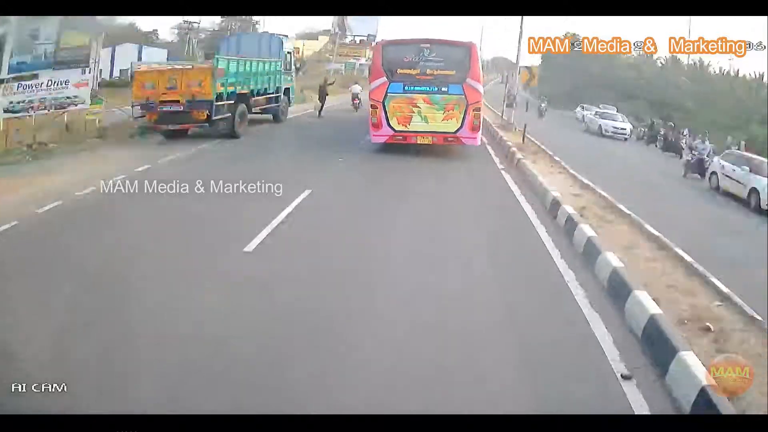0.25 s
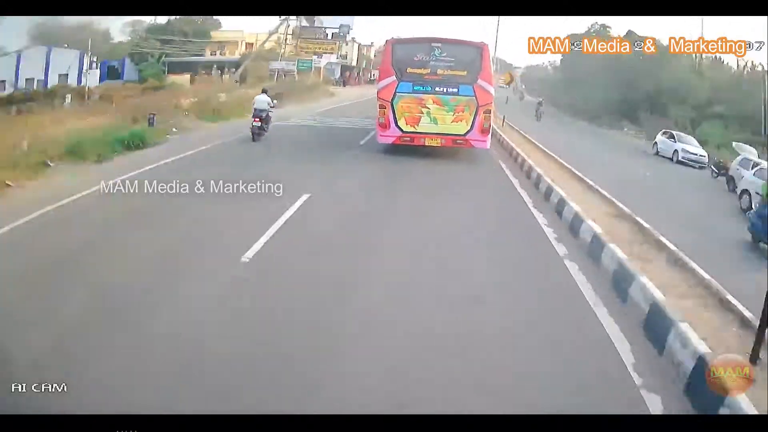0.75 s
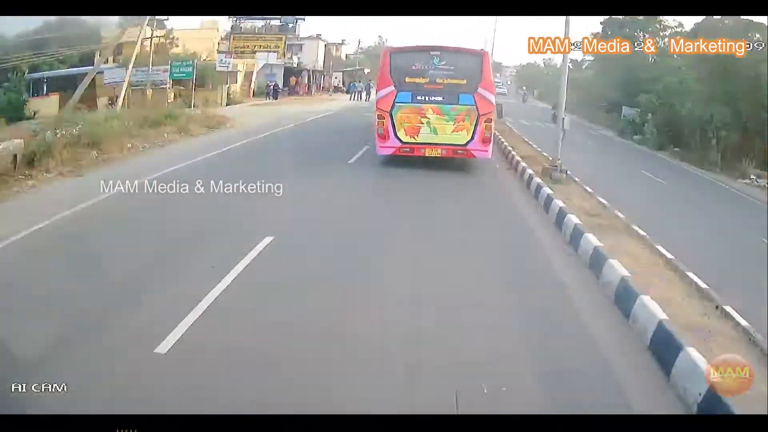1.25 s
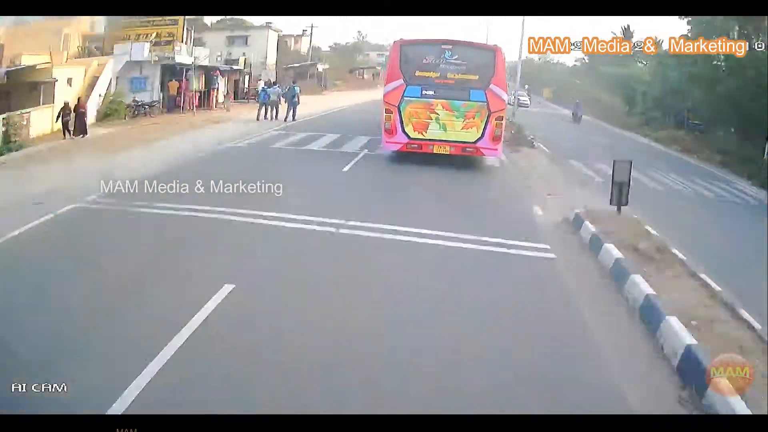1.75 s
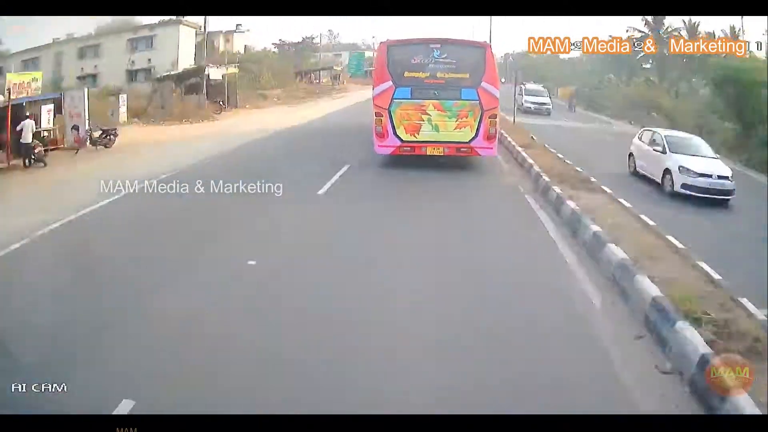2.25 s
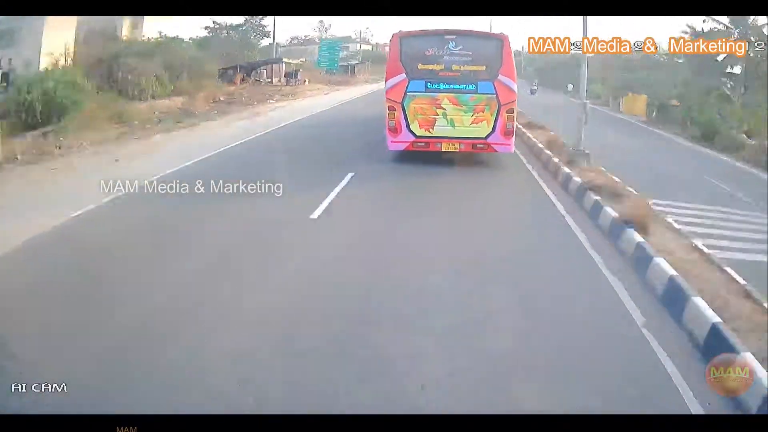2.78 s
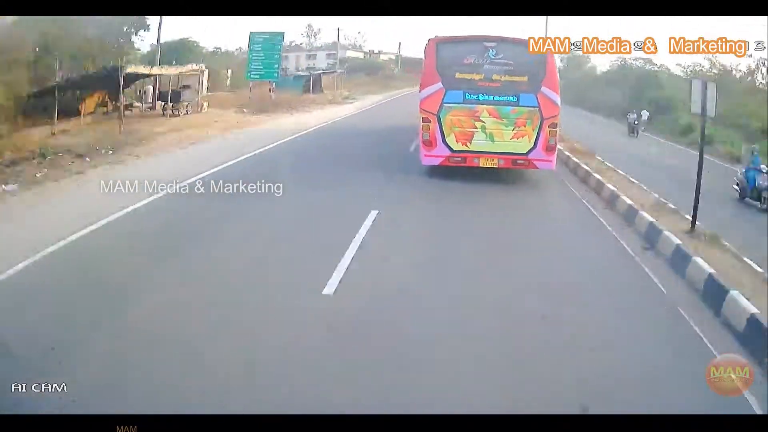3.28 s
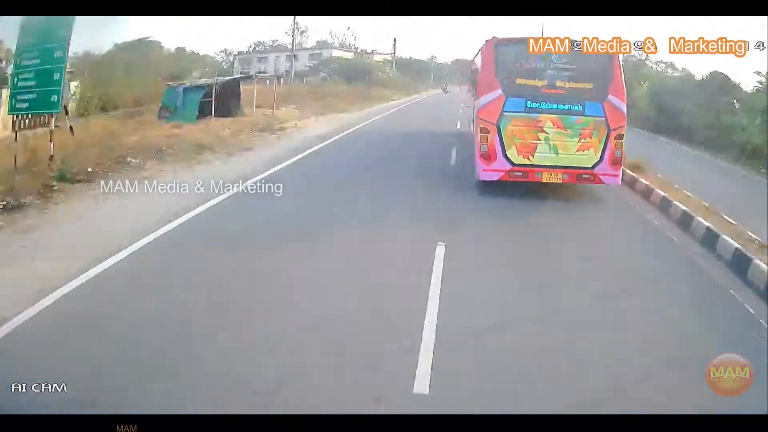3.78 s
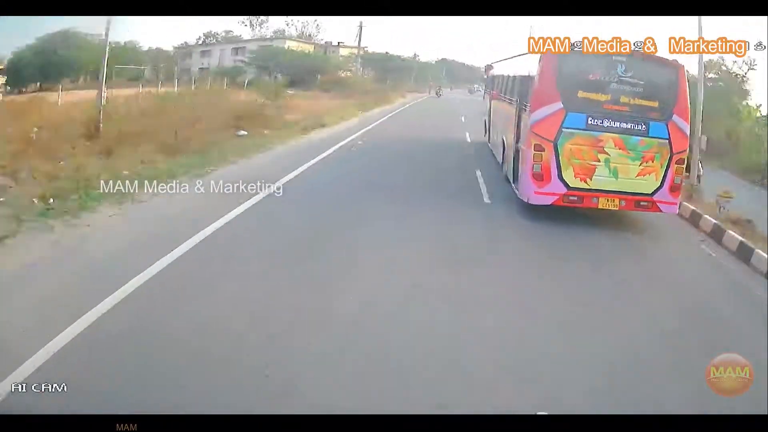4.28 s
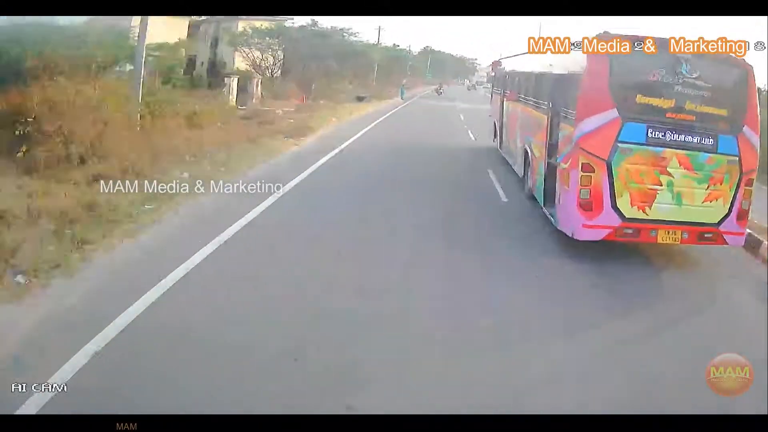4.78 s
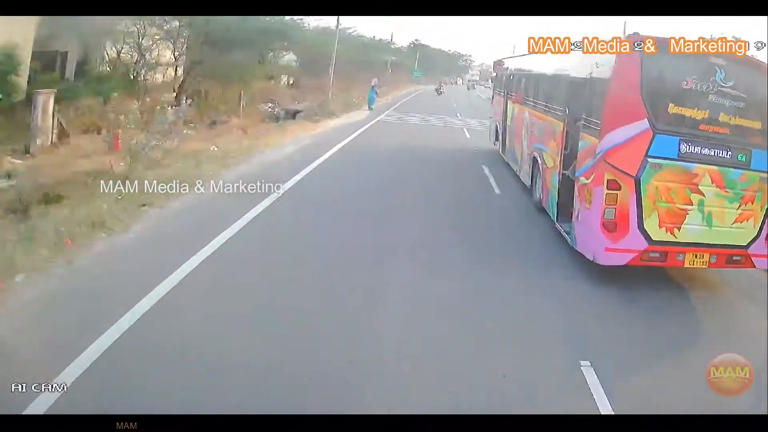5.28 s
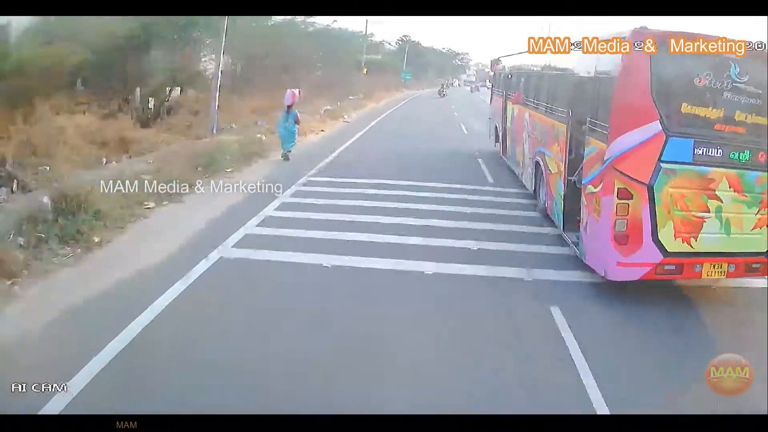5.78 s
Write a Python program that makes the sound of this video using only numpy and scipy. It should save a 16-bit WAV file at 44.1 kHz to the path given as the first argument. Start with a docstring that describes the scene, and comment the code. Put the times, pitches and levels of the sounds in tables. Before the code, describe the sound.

From inside the cab of a moving bus, a diesel engine drones with tyre roar and fine clatter. A passed lorry hisses briefly, followed by a small squeak and a dull knock. A shrill air horn taps twice, a lower horn sounds once, then the first stutters through a long call of rapid blasts. The horns echo off traffic and roadside while the cab noise sinks.

```python
"""Air horns from a diesel cab

A six-cylinder diesel drones at orders of its firing rate, with road roar, injector clatter and a
turbo whistle. A passed lorry hisses; a squeak and dull knocks follow. Air-driven reeds sound the horns:
a three-trumpet horn taps twice, a lower two-trumpet horn once, then the first stutters through a long
call while the cab noise sinks. Traffic and roadside return smeared, Doppler-shifted echoes."""
import sys
import numpy as np
from scipy import signal
from scipy.fft import rfft, irfft
from scipy.io import wavfile
from scipy.ndimage import uniform_filter1d

SR = 44100
rng = np.random.default_rng(int(sys.argv[2]) if len(sys.argv) > 2 else 0)


def dump_mix(stems):
    """Bounce the given channels to the path in sys.argv[1] as a 16-bit WAV at rate SR."""
    frames = np.atleast_2d(stems).T  # one column per channel
    limited = np.clip(frames, -1, 1)  # hard clip at full scale
    pcm = np.round(limited * 32767).astype(np.int16)
    wavfile.write(sys.argv[1], SR, pcm)


N = 265923
T = np.arange(N) / SR
F = np.maximum(np.fft.rfftfreq(N, 1 / SR), 1)
LR = np.array([[.5], [-.5]])  # splits a difference between left and right

# Engine slowing a little, wavering under the long call: time_s, firing_hz, drone_db
ENGINE_COURSE = [(.1, 65.4, -23.5), (1.54, 65, -22.5), (1.69, 65.3, -28.5), (2.1, 65.3, -23),
                 (2.37, 65., -24.5), (2.5, 63.5, -23), (4.2, 63.8, -23.5), (4.42, 62.26, -26.5),
                 (4.56, 62.7, -22.5), (4.8, 62.66, -28), (5.14, 63.1, -31), (5.21, 62.2, -23),
                 (5.29, 61.3, -40.5), (5.36, 61.3, -26), (5.47, 62.55, -29), (5.55, 62.6, -31.5),
                 (5.85, 62.4, -29)]
# Lines of the six-cylinder cycle, relative to the drone: firing_multiple, pulling_db, eased_db
ENGINE_ORDERS = [(.667, -16, -15), (.833, -23, -15), (1, -1.5, -1), (1.833, -13.5, -16),
                 (2.001, -17, -20.5), (2.165, -11.5, -20), (2.5, -13.5, -14.5), (3, -14.5, -15),
                 (4.333, -41, -23)]
# Cab noise, sinking under the long call: time_s, roar_db, hiss_db
CAB_LEVELS = [(.1, -28, -33), (.7, -28, -32.5), (1.5, -28.3, -33.5), (2.6, -27.3, -34), (3.4, -27.3, -34.5),
              (4.55, -28.3, -34.5), (4.9, -30.5, -37.5), (5.85, -33.5, -39)]
# Spectral shape of tyre and body roar: frequency_hz, density_db
ROAR_SPECTRUM = [(14, -25), (25, -12), (45, -15), (65, -11.5), (81, -5), (92, -14.5), (114, -11), (151, -9),
                 (300, -8.5), (446, -15), (766, -16), (882, -19), (1140, -25), (2400, -45), (3120, -70)]
# Spectral shape of clatter and wind hiss: frequency_hz, density_db
HISS_SPECTRUM = [(710, -17.5), (1200, -2), (1800, -9), (1980, -9), (2540, -12), (3500, -16), (3770, -14),
                 (5480, -16), (7550, -22.5), (8770, -20), (11100, -32), (14300, -42.5), (15500, -54.5)]
# Panel resonances, relative to the hiss: centre_hz, width_hz, level_db
PANEL_MODES = [(785, 50, -12), (2190, 40, -20), (2595, 40, -16), (2680, 50, -16), (3720, 70, -21),
               (4640, 300, -16), (5390, 150, -21)]
# Likeness of left and right cab noise: frequency_hz, coherence
CAB_COHERENCE = [(60, 1.0), (130, 0.88), (290, 0.69), (640, 0.65), (1410, 0.6), (3100, 0.73), (6820, 0.82),
                 (15000, 0.99)]
# Balance of the cab noise: frequency_hz, left_minus_right_db
CAB_BALANCE = [(60, 3.5), (110, 3.5), (200, 2.5), (380, 1.0), (700, 1.0), (1290, 0.5), (2380, 0.0),
               (4400, 0.0), (8120, -1.0), (15000, 0.0)]
# Turbo whistle: time_s, pitch_hz, level_db
TURBO_COURSE = [(.1, 8630, -62.5), (.7, 9170, -57), (1.6, 8900, -55.5), (1.7, 8750, -69.5),
                (1.8, 8200, -54), (2.7, 8560, -74), (4.5, 8370, -60.5), (5.9, 8570, -73)]
# Hiss of a lorry passed on the verge: time_s, level_db
LORRY_LEVELS = [(.52, -70), (.6, -40), (.72, -40), (.85, -52.5), (1.1, -49.5)]
# One rising squeak: start_s, end_s, from_hz, to_hz, level_db
SQUEAK_GLIDE = (1.01, 1.042, 1330, 1620, -28.5)
# Knocks in the cab: start_s, level_db, centre_hz, width_hz, t60_s
CAB_KNOCKS = [(1.622, -21.5, 800, 900, .12), (1.64, -24.5, 260, 25, .3), (4.2, -33, 2000, 2000, .03)]
# Horn spectra, a row per harmonic from the first, a column per trumpet: level_db
HIGH_HARMONICS = [(-37.5, -34.5, -39.5), (-20, -25, -18), (-29, -27, -26), (-27.5, -30, -32.5),
                  (-30, -30.5, -31.5), (-26.5, -29, -31), (-28.5, -31, -30.5), (-31.5, -31, -32),
                  (-33, -34, -37), (-33, -36, -35), (-29.5, -35.5, -34), (-30, -36, -39),
                  (-37.5, -38.5, -41.5), (-42.5, -43, -42.5), (-49, -43.5, -61), (-65, -60.5, -48),
                  (-60, -51.5, -86), (-46, -66, -78.5)]
LOW_HARMONICS = [(-39.5, -42.5), (-27, -25.5), (-27, -36), (-28.5, -40.5), (-39.5, -37.5), (-44.5, -37),
                 (-41, -43.5), (-40, -50), (-39.5, -40), (-39.5, -46), (-56, -44), (-41.5, -51),
                 (-42.0, -37.5), (-41, -45), (-46, -49), (-47, -50.5), (-44, -54), (-42.5, -61),
                 (-54.5, -59), (-50, -57), (-53, -78.5), (-59, -78), (-58, -80)]
# Valve presses; weak air lowers the deep overtones: start_s, end_s, rise_s, level_db, deep_db, shrill_db
HIGH_PRESSES = [(2.783, 2.85, 0.017, -3.5, -13, 0.9), (2.89, 2.96, 0.019, -3.5, -10.5, 1.5),
                (4.576, 4.66, .004, -0.5, -6.5, -0.5), (4.718, 5.021, .003, -2, -1, 1.1),
                (5.071, 5.162, .003, -3.5, -2.5, 3), (5.225, 5.301, .002, -2, -1.3, 0.5),
                (5.369, 5.411, .002, -2, -1.3, .4), (5.467, 5.537, .0018, -2, 0.3, 3.5),
                (5.621, 5.655, .0016, -1.4, -3.5, 4), (5.756, 5.811, .0024, -1.4, -6.5, 3)]
LOW_PRESSES = [(3.741, 3.879, 0.033, .1, -9.5, 1)]
# Side the horns favour as traffic shifts: time_s, left_minus_right_db
HORN_BALANCE = [(2.7, -1.5), (3.4, -1.5), (3.7, 4), (4.2, 4), (4.5, -6)]

HIGH_PITCHES_HZ, LOW_PITCHES_HZ = [749.6, 803., 892.3], [570., 687.]
EASE_S = 1.52  # the driver eases the throttle
DEEP_BELOW_HZ, SHRILL_ABOVE_HZ = 2000, 4200  # bands of horn overtones
VALVE_S, SURGE, SURGE_S = .0017, .22, .022
PRESS_SPREAD_DB, KNOCK_SPREAD_DB = .47, 3.4  # scatter between presses and between injections
RASP_PER_DB, RASP_DB_PER_S = -.28, -23  # reeds rasp more on weak air, less in a long press
ECHO_LAG_S, ECHO_PAIRS, DOPPLER_RANGE = .028, 6, (-.012, .045)
START_S, END_S, TOP_HZ = .0762, 5.887, 15560


def undb(db):
    """Amplitude ratio of a level in decibels."""
    return 10 ** (np.asarray(db) / 20)


def unit(x):
    """Normalisation to an rms of 1."""
    return x / np.sqrt(np.mean(x ** 2))


def over_time(table):
    """Linear interpolation in time: one curve for each column after the first."""
    times, *columns = np.transpose(table)
    return [np.interp(T, times, column) for column in columns]


def over_hz(table):
    """Interpolation on a logarithmic frequency axis."""
    hz, value = np.transpose(table)
    return np.interp(np.log(F), np.log(np.maximum(hz, 1)), value)


def wander(rate_hz):
    """Band-limited fluctuation: random steps, smoothed twice, of rms 1."""
    hold = int(SR / rate_hz)
    steps = np.repeat(rng.standard_normal(N // hold + 1), hold)
    return unit(uniform_filter1d(uniform_filter1d(steps, hold), hold)[:N])


def lag(x, seconds):
    """First-order relaxation with the given time constant."""
    pole = np.exp(-1 / (max(seconds, 1e-4) * SR))
    return signal.lfilter([1 - pole], [1, -pole], x)


def cab_spectra(gain):
    """Partial coherence: left and right noise spectra mix a common and an opposed part."""
    mid, side = rfft(rng.standard_normal((2, N)))
    coherence = np.clip(over_hz(CAB_COHERENCE), 0, 1)
    pair = np.sqrt(1 + coherence) * mid + 2 * LR * np.sqrt(1 - coherence) * side
    return gain * undb(LR * over_hz(CAB_BALANCE)) * pair


def resonance(hz, width_hz):
    """A resonance selects a narrow band from broadband noise."""
    return unit(irfft(cab_spectra(1 / (1 + ((F - hz) / width_hz * 2) ** 2)), N))


def fluttering_noise(spectrum, swell_db, flicker_db, rate_hz):
    """Amplitude modulation: half-octave bands swell together and flicker independently."""
    whole, swell, out = cab_spectra(undb(over_hz(spectrum))), wander(1.505), 0
    for octave in np.arange(4, 14.1, .5):
        band = np.clip(1 - 2 * abs(np.log2(F) - octave), 0, 1)
        out += undb(swell_db * swell + flicker_db * wander(rate_hz)) * irfft(whole * band, N)
    return unit(out)


def firing_drone(firings, eased):
    """Periodic combustion gives a line spectrum whose balance depends on load."""
    drone = 0
    for order, pulling_db, eased_db in ENGINE_ORDERS:
        waver_db = (.8 if order == 1 else 2.2) * wander(11)
        gain = undb(pulling_db + (eased_db - pulling_db) * eased + waver_db)
        drone += gain * np.sqrt(2) * np.sin(2 * np.pi * (order * firings + rng.random()))
    return drone


def road_roar():
    """Random vibration of tyres and body gives broadband noise, strongest in the bass."""
    return fluttering_noise(ROAR_SPECTRUM, swell_db=-.04, flicker_db=.64, rate_hz=8)


def injector_clatter(firings, eased):
    """Injection impacts modulate hiss and panel resonances; every second cylinder knocks harder."""
    index = firings.astype(int)
    knock_db = KNOCK_SPREAD_DB * rng.standard_normal(index[-1] + 1)[index] - 2.1 * (index % 2)
    knocks = undb(knock_db) * np.exp(-(firings % 1))
    panels = sum(undb(db - 3 * eased + 1.2 * wander(20)) * resonance(hz, width_hz)
                 for hz, width_hz, db in PANEL_MODES)
    hiss = fluttering_noise(HISS_SPECTRUM, swell_db=-.13, flicker_db=-.27, rate_hz=23)
    return (hiss + panels) * unit(1 + .52 * lag(knocks, .001))


def engine_and_road():
    """Drone and clatter are phase-locked to one firing cycle; the roar is independent of it."""
    firing_hz, drone_db = over_time(ENGINE_COURSE)
    roar_db, hiss_db = over_time(CAB_LEVELS)
    firings = np.cumsum(firing_hz * (1 + .0062 * wander(12))) / SR
    eased = lag(1. * (T > EASE_S), .05)
    drone = undb(drone_db + 3.5 * LR) * firing_drone(firings, eased)
    return drone + undb(roar_db) * road_roar() + undb(hiss_db) * injector_clatter(firings, eased)


def turbo_whistle():
    """Random modulation broadens the shaft tone into a narrow band of noise."""
    hz, db = over_time(TURBO_COURSE)
    phase = 2 * np.pi * np.cumsum(hz) / SR
    return undb(db) * (wander(450) * np.cos(phase) + wander(450) * np.sin(phase))


def lorry_hiss():
    """Two bands of treble noise swell and fade as a lorry is passed."""
    db = np.interp(T, *np.transpose(LORRY_LEVELS), left=-99, right=-99)
    return undb(db) * unit(resonance(7060, 900) + 1.3 * resonance(8600, 1600))


def squeak():
    """A linear chirp: one tone glides upward under an arched envelope."""
    start_s, end_s, from_hz, to_hz, db = SQUEAK_GLIDE
    progress = np.clip((T - start_s) / (end_s - start_s), 0, 1)
    phase = 2 * np.pi * np.cumsum(from_hz + (to_hz - from_hz) * progress) / SR
    return undb(db) * np.sin(np.pi * progress ** 1.8) * np.sin(phase)


def cab_knocks():
    """Damped resonances decay exponentially after a softened onset."""
    out = 0
    for start_s, db, hz, width_hz, t60_s in CAB_KNOCKS:
        decay = (T > start_s) * np.exp(-np.maximum(T - start_s, 0) * np.log(1000) / t60_s)
        out += undb(db) * lag(decay, .007) * resonance(hz, width_hz)
    return out


def air_valve(presses, rasp_db):
    """Line pressure peaks as the valve opens; the air supply sets a reed's band gains and roughness."""
    flow, deep_gain, shrill_gain, rasp = np.zeros((4, N))
    for start_s, end_s, rise_s, db, deep_db, shrill_db in presses:
        surge = 1 + SURGE * np.exp(-np.maximum(T - start_s, 0) / SURGE_S)
        opening = lag(np.clip((T - start_s) / rise_s, 0, 1) * (T < end_s), VALVE_S)
        press = undb(db + PRESS_SPREAD_DB * rng.standard_normal()) * surge * opening
        flow += press
        deep_gain += undb(deep_db) * press
        shrill_gain += undb(shrill_db) * press
        rasp[T > start_s] = undb(rasp_db + RASP_PER_DB * deep_db + RASP_DB_PER_S * (end_s - start_s))
    return flow, deep_gain, shrill_gain, rasp


def periodic_wave(cycles, harmonics):
    """Fourier synthesis: one period of summed harmonics, repeated along a running phase."""
    return np.interp(cycles % 1, np.linspace(0, 1, harmonics.shape[1]), harmonics.sum(0))


def air_horn(pitches_hz, harmonics_db, presses, pitch_jitter, echo_db, t60_s, rasp_db):
    """Each trumpet's reed chops the air into a harmonic series, heard directly and by reflection."""
    order = np.arange(1, len(harmonics_db) + 1)
    period = np.linspace(0, 1, 2049)
    pan_db = LR * over_time(HORN_BALANCE)[0]
    blare, buzz, echo = 0, 0, 0
    for hz, db in zip(pitches_hz, np.transpose(harmonics_db)):
        phases = 2 * np.pi * (order[:, None] * period + rng.random((len(order), 1)))
        waves = undb(db)[:, None] * np.sqrt(2) * np.sin(phases)
        deep, shrill = (order > 1) & (order * hz < DEEP_BELOW_HZ), order * hz > SHRILL_ABOVE_HZ
        flow, deep_gain, shrill_gain, rasp = air_valve(presses, rasp_db)
        cycles = np.cumsum(hz * (1 + pitch_jitter * wander(30))) / SR
        # the reed beats unevenly: timing slips blur high harmonics most, and its strength flutters
        slipped = cycles + .048 * rasp * wander(260)
        blare += deep_gain * (1 + .45 * rasp * wander(110)) * periodic_wave(cycles, waves[deep])
        core = flow * periodic_wave(slipped, waves[~deep & ~shrill])
        edge = shrill_gain * periodic_wave(slipped, waves[shrill])
        buzz += (1 + rasp * wander(700)) * (core + edge)
        # distance dulls the top and evens out the blare
        far_db = -8.5 * deep + 3 * (order == 1) - 4.9 * (order * hz / 10000) ** 2
        echo += traffic_echoes(cycles, waves * undb(far_db)[:, None], undb(echo_db) * flow, t60_s, pan_db)
    buzz = undb(.55 * pan_db) * buzz  # the treble leans less to one side
    buzz = near_reflection(buzz, gain=.71, delay_s=.001199, drift_s=.000201)
    buzz = near_reflection(buzz, gain=.55, delay_s=.0031, drift_s=.00013)
    return undb(pan_db) * blare + buzz + echo


def near_reflection(x, gain, delay_s, drift_s, apart_s=.00001):
    """Comb filtering: interference with a changing path makes single harmonics swell and sink."""
    path_s = delay_s + drift_s * wander(9)
    late = [np.interp(T - np.maximum(path_s + apart_s * wander(7.5), 0), T, channel) for channel in x]
    return (x + gain * np.array(late)) / np.sqrt(1 + gain ** 2)


def traffic_echoes(cycles, waves, drive, t60_s, pan_db):
    """Passing surfaces return Doppler-shifted copies whose energy builds in a press and then decays."""
    energy = lag(np.roll(drive ** 2, int(ECHO_LAG_S * SR)), t60_s / np.log(1e6))
    copies = []
    for shift in np.linspace(*DOPPLER_RANGE, 2 * ECHO_PAIRS):
        shifted = cycles * (1 + shift) + .127 * wander(60) + rng.random()
        copies.append(undb(-180 * shift) * periodic_wave(shifted, waves))  # higher copies are fainter
    mid, side = sum(copies[::2]), sum(copies[1::2])
    return np.sqrt(energy / ECHO_PAIRS) * (undb(.32 * pan_db) * mid + 1.1 * LR * side)


def scene():
    """Superposition: the pressures of cab, road and both horns add."""
    high_horn = air_horn(HIGH_PITCHES_HZ, HIGH_HARMONICS, HIGH_PRESSES,
                         pitch_jitter=.002, echo_db=.4, t60_s=.69, rasp_db=-10.5)
    low_horn = air_horn(LOW_PITCHES_HZ, LOW_HARMONICS, LOW_PRESSES,
                        pitch_jitter=.0045, echo_db=-1.5, t60_s=.61, rasp_db=-6)
    cab = engine_and_road() + turbo_whistle() + lorry_hiss() + squeak() + cab_knocks()
    return cab + high_horn + low_horn


def record(dry):
    """Saturation rounds peaks, a gate cuts in and out hard, and low-passes centre and limit the top."""
    rounded = np.tanh(.74 * dry) / .68
    mid, side = rounded.mean(0), (rounded[0] - rounded[1]) / 2
    side = signal.sosfiltfilt(signal.butter(6, 9800, fs=SR, output="sos"), side)
    gated = np.array([mid + side, mid - side]) * (T > START_S) * (T < END_S)
    return signal.sosfilt(signal.ellip(14, .2, 105, TOP_HZ, fs=SR, output="sos"), gated)


dry = scene()
out = record(dry)
dump_mix(out)
```